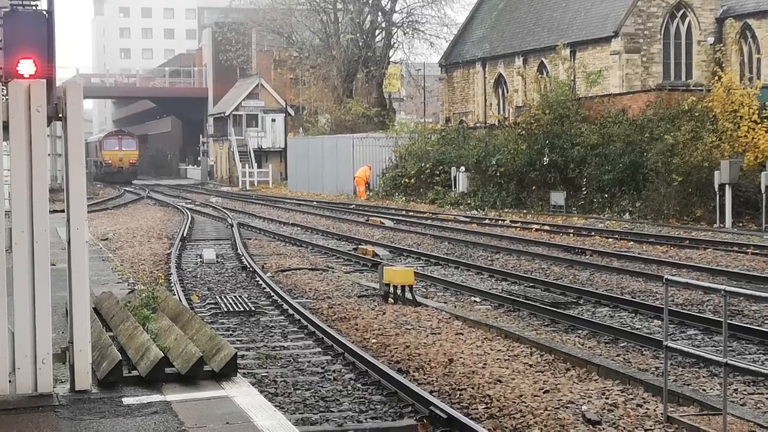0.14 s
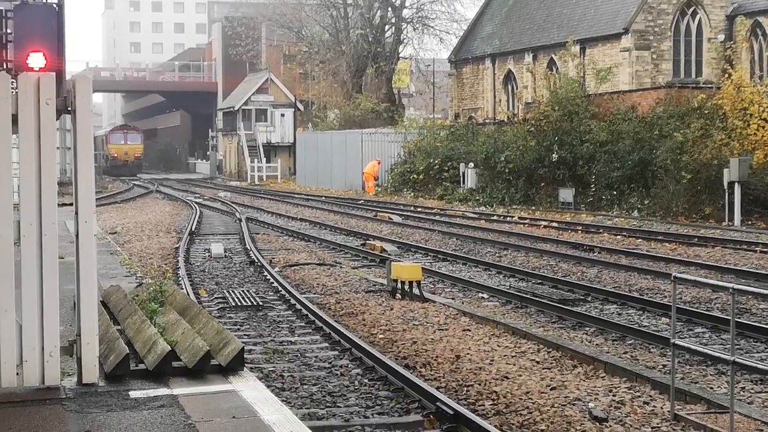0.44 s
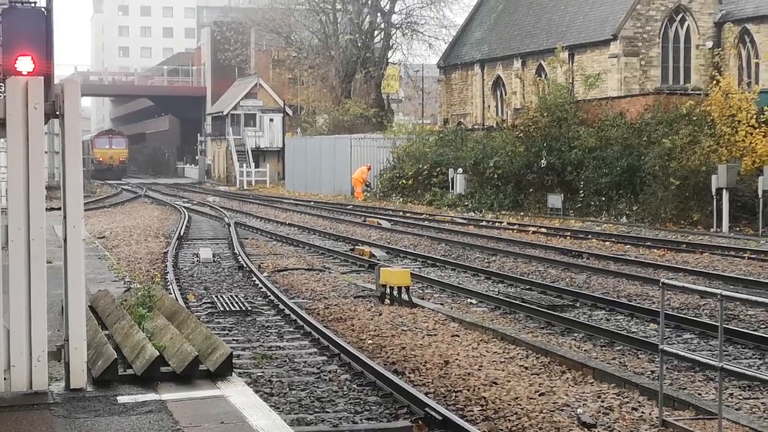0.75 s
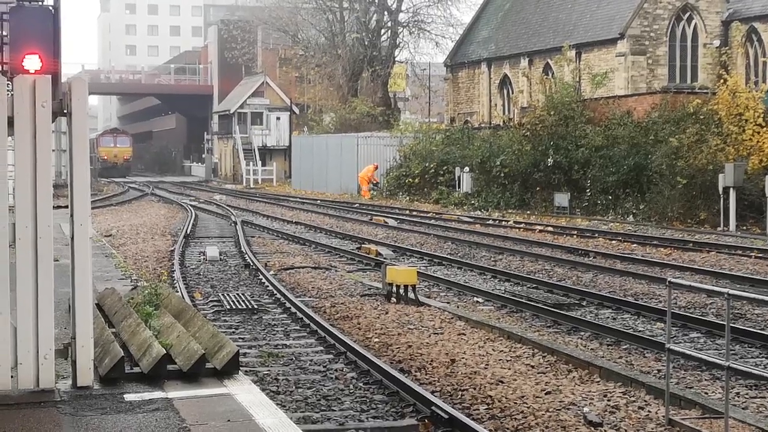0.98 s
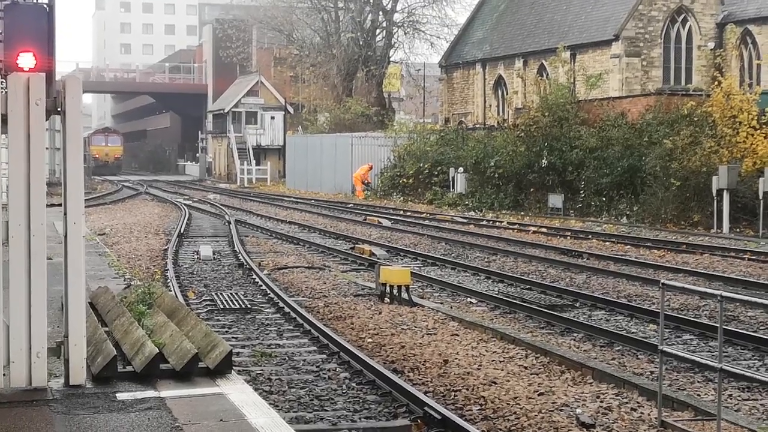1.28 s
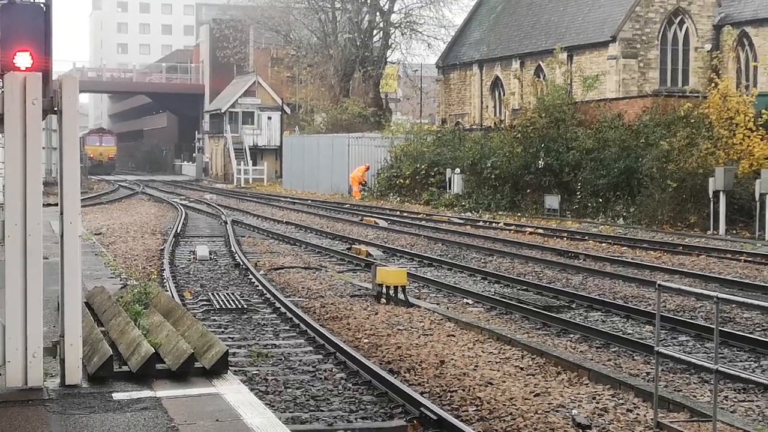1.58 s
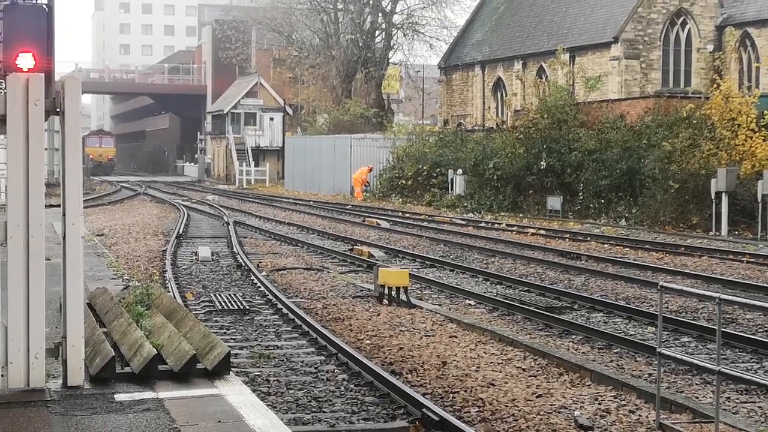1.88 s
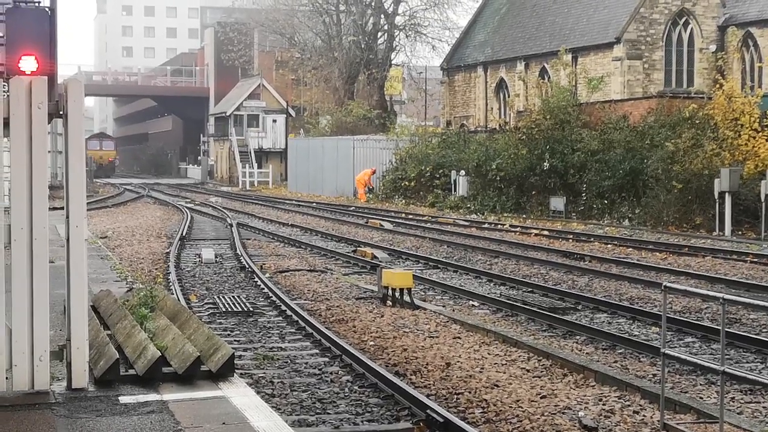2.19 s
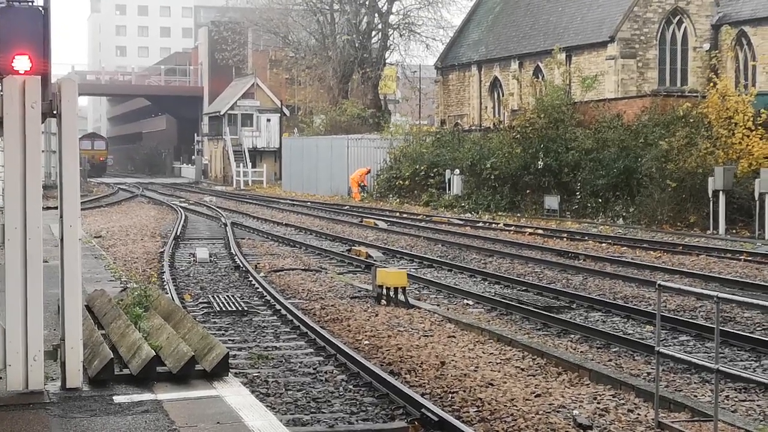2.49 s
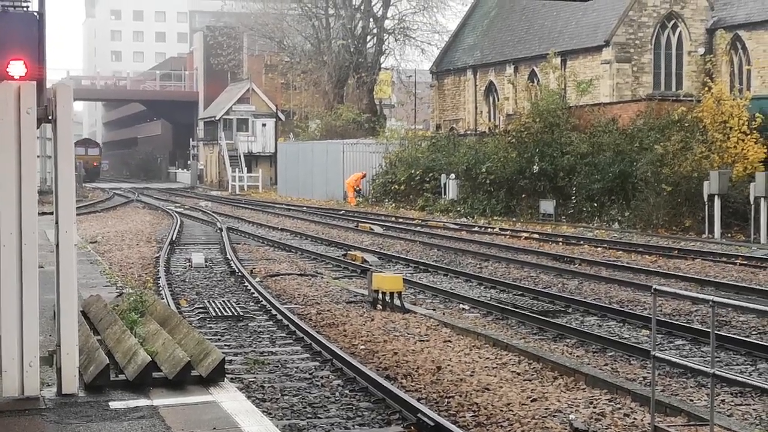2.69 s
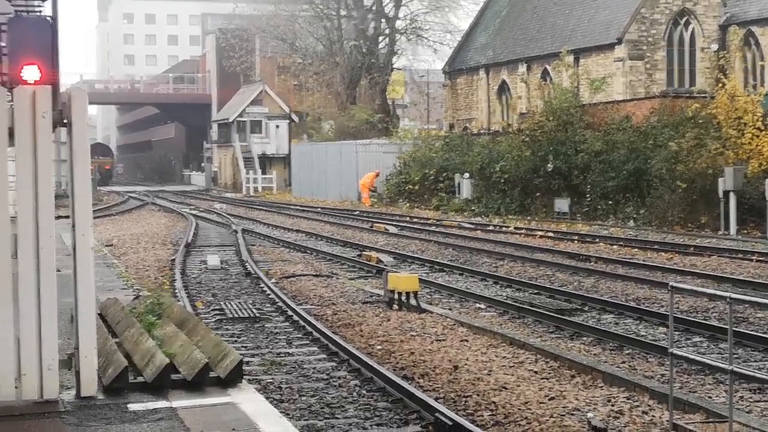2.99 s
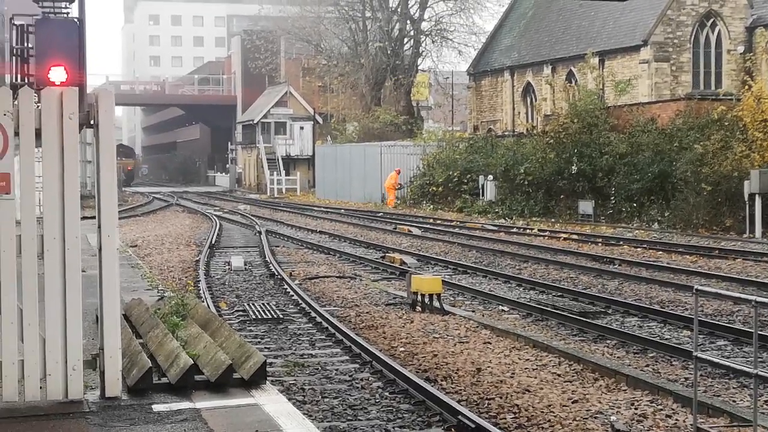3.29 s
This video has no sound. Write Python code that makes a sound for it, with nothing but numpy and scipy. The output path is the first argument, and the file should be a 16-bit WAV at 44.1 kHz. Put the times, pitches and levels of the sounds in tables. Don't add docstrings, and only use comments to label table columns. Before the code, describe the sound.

Two diesel locomotives drone at steady revs beside a station platform, bass beating and chugging under constant airy hiss; wheel roar swells past the middle, then eases. Outdoor stereo pickup, wide in the treble.

```python
import sys
import numpy as np
from scipy import signal
from scipy.fft import rfft, irfft, next_fast_len
from scipy.io import wavfile
from scipy.ndimage import uniform_filter1d

SR = 44100
rng = np.random.default_rng(int(sys.argv[2]) if len(sys.argv) > 2 else 0)


def generate_wav(sig):
    pcm = np.round(np.clip(np.atleast_2d(sig).T, -1, 1) * 32767).astype(np.int16)
    wavfile.write(sys.argv[1], SR, pcm)


def boost(x):
    u = np.asarray(x, float) / 20
    return 10 ** u


N = 152145


def curve(rows, col):
    rows = np.array(rows, float)
    return np.interp(np.arange(N) / SR, rows[:, 0], rows[:, col])


def at(rows, hz, edge=None):
    rows = np.array(rows, float)
    return np.interp(np.log(hz), np.log(rows[:, 0]), rows[:, 1], edge, edge)


def walk(rate):
    hold = int(SR / rate)
    steps = np.repeat(rng.standard_normal(N // hold + 1), hold)
    return 1.3 * uniform_filter1d(uniform_filter1d(steps, hold), hold)[:N]


def tone(hz, db):
    phase = 2 * np.pi * (np.cumsum(hz) / SR + rng.random())
    return np.sqrt(2) * boost(db) * np.sin(phase)


def mid_rms(pair):
    return np.sqrt(np.mean(pair.mean(0) ** 2))


def ports(gain, lean_db):
    # f/Hz, side minus mid level/dB
    width = [(40, -33), (70, -25), (110, -14), (330, -7.5), (600, 4.5), (1000, 2.5), (1500, -5), (3200, -2),
             (8500, -0.5)]
    # f/Hz, left minus right level/dB
    diffuse_lean = [(300, 0.5), (750, -1.5), (1100, -1), (2000, -3), (2600, 4), (5000, 4), (7800, 2.5),
                    (10000, -1.5)]
    # f/Hz, phase by which the left port leads/rad
    lag = [(100, 0.092), (260, 0.25), (420, 0.27), (1500, 0.02), (2100, 1.23), (2800, 0.77), (4600, 0.97),
           (7600, 0.3)]
    size = next_fast_len(N)
    hz = np.maximum(np.arange(size // 2 + 1) * SR / size, 1)
    mid, side = rfft(rng.standard_normal((2, size))) * gain(hz)
    ring_side_db = -7
    side = side * boost(at(width, hz) + (0 if lean_db is None else ring_side_db))
    left_right_db = at(diffuse_lean, hz) if lean_db is None else lean_db
    lean = boost(left_right_db / 2) * np.exp(.5j * at(lag, hz))
    return np.array([(mid + side) * lean, (mid - side) / lean]), hz, size


def air(colour, db, throb_db, per_octave=2):
    swell_db, flicker_db = .1, .35
    pair, hz, size = ports(lambda f: boost(at(colour, f, -91)), None)
    place = np.log2(hz) * per_octave
    shared = swell_db * walk(0.24) + throb_db * walk(30.1)
    first = int(np.log2(colour[0][0]) * per_octave)
    last = int(np.log2(colour[-1][0]) * per_octave) + 1
    out = 0
    for k in range(first, last + 1):
        triangle = np.clip(1 - np.abs(place - k), 0, 1)
        band = irfft(pair * triangle, size)[:, :N]
        out = out + band * boost(shared + flicker_db * walk(9.1))
    return out * boost(db) / mid_rms(out)


def ring(centre_hz, width_hz, db, lean_db, wander_db):
    pair, hz, size = ports(lambda f: 1 / (1 + (2 * (f - centre_hz) / width_hz) ** 2) ** 1.44, lean_db)
    out = irfft(pair, size)[:, :N]
    return out * boost(db + wander_db * walk(4.06)) / mid_rms(out)


def engine(shaft_hz, orders):
    speed = shaft_hz * (1 + 0.0029 * walk(2.05))
    t = (np.arange(N) - N / 2) / SR
    return sum(tone(k * speed, db + wander * walk(2.5) + growth * t) for k, db, wander, growth in orders)


def engines():
    slow_orders = [(6, -47, 1.2, 2.5), (8, -49, 1.5, 5), (9, -33, .7, 0), (10, -53, 2, 1),
                   (12, -50, 2.5, -2)]
    fast_orders = [(8, -52, 2.2, 0), (10, -47, 2.5, 0), (18, -52, 1.4, 0)]
    return engine(4.425, slow_orders) + engine(7.5, fast_orders)


def bursts(rows, spread_s):
    t = np.arange(N) / SR
    power = sum(boost(db) ** 2 * np.exp(-((t - s) / spread_s) ** 2) for s, db, _ in rows)
    rough_pitch = curve(rows, 2) * (1 + .022 * walk(12.08))
    return np.sqrt(power) * tone(rough_pitch, 0)


def exhaust():
    # t/s, peak level/dB, pipe f/Hz
    chugs = [(.025, -29.5, 70), (.09, -37, 68.5), (.169, -29.5, 63.6), (.24, -38, 65.8), (.341, -31, 67.66),
             (.461, -32.5, 69.7), (.569, -32, 70.3), (.641, -32, 68.64), (.739, -29.5, 68),
             (.859, -29.5, 63.5), (.981, -36, 66.1), (1.099, -34, 63.03), (1.17, -41, 66),
             (1.28, -34.5, 70.33), (1.387, -31.5, 68.27), (1.549, -33, 68.5), (1.631, -39, 65.9),
             (1.704, -39, 74), (1.78, -33, 69.86), (1.864, -40, 68.04), (1.994, -33.5, 65),
             (2.147, -37.5, 69.9), (2.283, -38, 66), (2.419, -32, 69.96), (2.645, -37, 68),
             (2.726, -41.5, 69), (2.908, -33.5, 72.04), (3.0, -43, 70.17), (3.123, -35.5, 72),
             (3.229, -36, 67.95), (3.313, -36.5, 70), (3.44, -31.5, 67.6)]
    # t/s, peak level/dB, f/Hz
    knocks = [(.22, -41, 242), (.37, -48, 240.4), (.48, -47, 243), (.84, -40, 243), (1.0, -43, 253.7),
              (1.45, -44.5, 245.7), (1.5, -52, 238), (1.62, -46, 241.3), (2.29, -46, 240), (2.37, -50, 243),
              (2.59, -47, 249.6), (3.25, -51.5, 256.9), (3.39, -47, 245)]
    # t/s, level/dB
    boom = [
        (0, -35),
        (1.0, -37),
        (2.0, -48.5),
        (3.45, -40),
    ]
    # f/Hz, bandwidth/Hz, level/dB, left minus right/dB
    ground = [(28, 16, -48, 0), (49, 14, -49, 0), (290, 60, -59, 0)]
    pulses = bursts(chugs, .028) + bursts(knocks, .016)
    pipe_rumble = ring(67, 30, -7, 0, .3) * boost(curve(boom, 1))
    return pulses + pipe_rumble + sum(ring(*row, wander_db=2.0) for row in ground)


def fan():
    # t/s, f/Hz, level/dB
    hum = [(0.0, 169, -65), (0.03, 170.3, -46), (0.44, 172.4, -45.5), (0.79, 182, -49),
           (1.55, 175.8, -43.5), (1.82, 175.7, -47), (1.93, 175.8, -40.5), (2.07, 184.8, -49.5),
           (2.17, 162, -44.5), (2.39, 173, -43), (3.42, 176.9, -42.5), (3.45, 178.7, -50)]
    return tone(curve(hum, 1) * (1 + 0.009 * walk(14)), curve(hum, 2) - .4 + 1.0 * walk(11.1))


def rumble():
    # f/Hz, spectral density/(dB per Hz)
    rumble_colour = [(18, -17), (40, 0.5), (60, 0), (88, -8.5), (110, -9.5), (160, -6), (250, -12.5),
                     (400, -23)]
    return air(rumble_colour, -39.5, 0.19)


def body():
    # f/Hz, bandwidth/Hz, level/dB, left minus right/dB
    modes = [(199.9, 9.5, -53.5, -4), (243, 35, -56.5, 2), (1543, 224, -51.5, 4.5), (1656, 21, -61, 5),
             (1956, 92, -53.5, 8), (2114, 99, -61.5, -2), (2557, 190, -52.5, 12), (3185, 58, -61, -13),
             (3850, 130, -63, -24)]
    # f/Hz, spectral density/(dB per Hz)
    roar_colour = [(220, -34), (380, -17.5), (442, -4), (495, -8.5), (878, -7), (1600, -2), (1740, -1),
                   (2740, -1.5), (3600, -13.5), (4680, -49.5), (7920, -120)]
    return sum(ring(*row, wander_db=1.56) for row in modes) + air(roar_colour, -41.5, 0.15)


def hiss():
    # f/Hz, spectral density/(dB per Hz)
    hiss_colour = [(3000, -26), (3400, -6.5), (4200, -4), (6400, -8.5), (7900, -12), (9300, -19.5),
                   (10100, -31), (15600, -43)]
    return air(hiss_colour, -49, .8)


def turbo():
    # f/Hz, bandwidth/Hz, level/dB, left minus right/dB
    whistles = [(2830, 66, -55.5, 3), (3910, 110, -68, 3), (5530, 790, -63, 3), (6830, 210, -67, 2),
                (7340, 320, -64.5, 2), (7800, 370, -60, 1.4)]
    return sum(ring(*row, wander_db=1.5) for row in whistles)


def flow_swing():
    # t/s, level/dB
    flow = [
        (0.0, -45),
        (1.6, -42.5),
        (2.28, -43),
        (2.54, -42.5),
        (2.85, -43),
        (3.1, -44),
        (3.45, -43.5),
    ]
    level = curve(flow, 1)
    return level - np.mean(level)


def wheels():
    # t/s, level/dB
    passing = [
        (0, -70),
        (.7, -58),
        (1.3, -55),
        (1.9, -52.5),
        (2.25, -46.5),
        (2.5, -49),
        (2.75, -50),
        (3.1, -50),
        (3.45, -62),
    ]
    return ring(3070, 1600, 0, 4.8, .3) * boost(curve(passing, 1))


def ticks():
    # t/s, level/dB
    contacts = [
        (1.1511, -67),
        (1.5289, -60),
        (1.5858, -64),
        (1.8257, -70),
        (2.6943, -66),
        (3.1313, -67),
    ]
    decay_ms, trim_db = 3, -1
    t, shape = np.arange(N) / SR, np.zeros(N)
    for s, db in contacts:
        shape += boost(db + trim_db) * (t >= s) * np.exp(-np.maximum(t - s, 0) * 1000 / decay_ms)
    bright = signal.butter(2, 9000, "high", fs=SR, output="sos")
    return signal.sosfilt(bright, rng.standard_normal((2, N)) * shape)


def scene():
    flow = flow_swing()
    low = engines() + exhaust() + fan() + rumble()
    middle = body() * boost(.5 * flow)
    treble = hiss() * boost(1.0 * flow) + turbo() * boost(4.1 * flow)
    return low + middle + treble + wheels() + ticks()


def low_pass(x):
    return signal.sosfilt(signal.butter(12, 15200, fs=SR, output="sos"), x)


def record(dry):
    return low_pass(dry)


dry = scene()
out = record(dry)
generate_wav(out)
```